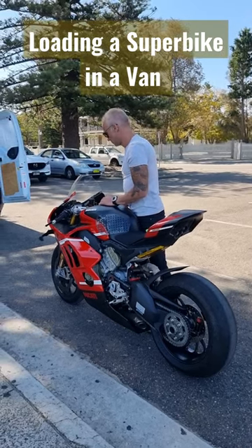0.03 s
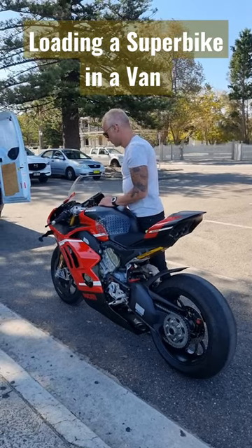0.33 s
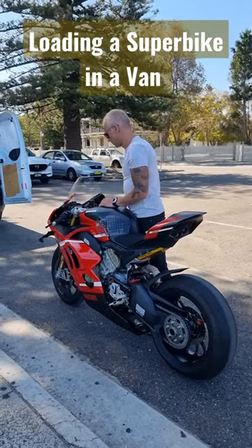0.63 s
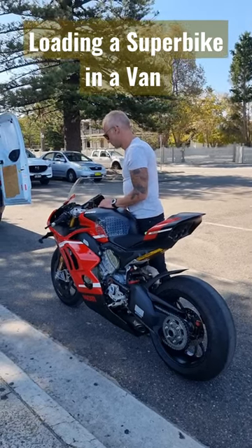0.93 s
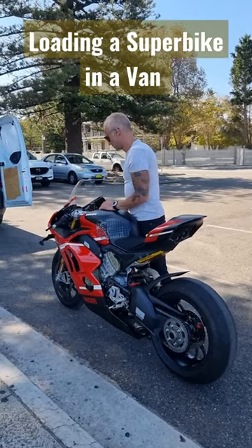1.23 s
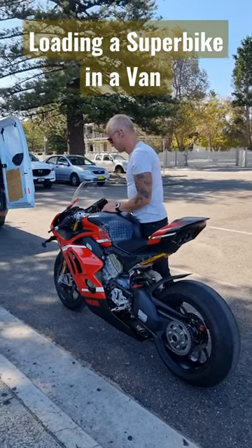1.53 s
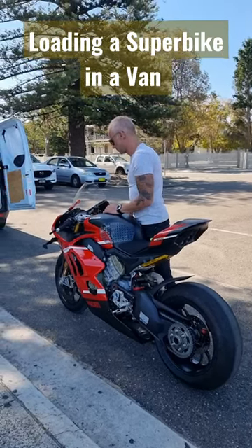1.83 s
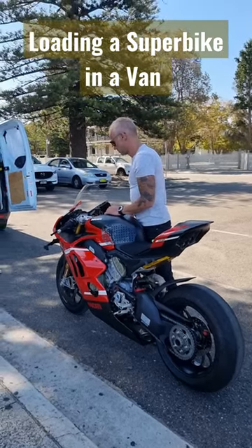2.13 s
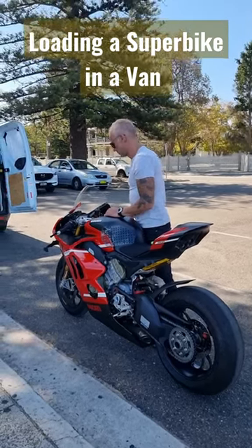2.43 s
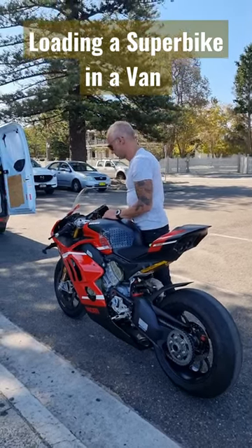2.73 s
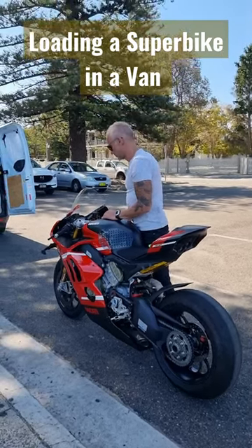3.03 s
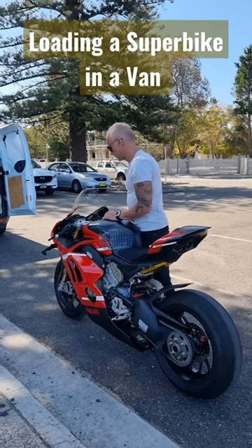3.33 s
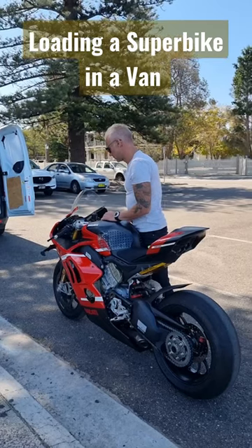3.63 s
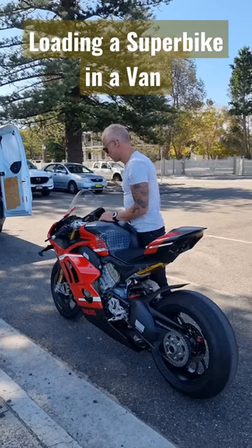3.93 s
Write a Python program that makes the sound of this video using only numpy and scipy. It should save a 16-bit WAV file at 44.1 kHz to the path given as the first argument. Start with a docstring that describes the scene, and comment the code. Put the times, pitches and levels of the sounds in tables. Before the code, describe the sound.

A motorcycle idles with a lumpy beat and is revved in five quick blips.

```python
"""A V4 motorcycle idles in an open car park and its throttle is blipped five times.
Each engine cycle gives two double exhaust beats: every slug of gas radiates a low thud that excites
the pipe's resonances, and its turbulence adds a spit of hiss. When the throttle shuts the firing dies,
the exhaust booms and the engine stumbles back to idle. The valve gear clatters throughout, the intake
and chains rasp with the revs, and the surroundings return a short, dull echo."""
import sys
import numpy as np
from scipy import signal
from scipy.fft import rfft, irfft
from scipy.io import wavfile

SR = 44100
rng = np.random.default_rng(int(sys.argv[2]) if len(sys.argv) > 2 else 0)


def wrap_up_sound(samples):
    """Save the sound to the file named by the first command line argument, as 16-bit audio."""
    columns = np.atleast_2d(samples).T
    # keep every value between -1 and 1, then stretch to whole-number steps
    tamed = np.clip(columns, -1, 1)
    steps = np.round(tamed * 32767).astype(np.int16)
    wavfile.write(sys.argv[1], SR, steps)


N = 176400
TIME = np.arange(N) / SR


def from_db(db):
    """Amplitude grows tenfold for every 20 dB."""
    return 10 ** (np.asarray(db) / 20)


def curve(rows, s):
    """Linear interpolation of a table in time."""
    return np.interp(s, *np.transpose(rows))


def at_hz(rows, hz):
    """Interpolation of a table on a log-frequency axis."""
    f, v = np.transpose(rows)
    return np.interp(np.log(hz + 1), np.log(f), v)


def cut(x, hz, kind, order=2):
    """A Butterworth filter has a maximally flat passband."""
    return signal.sosfilt(signal.butter(order, hz, kind, fs=SR, output="sos"), x + 1e-18)


def resonate(x, hz, width_hz):
    """A damped resonator passes a band around its natural frequency."""
    return signal.lfilter(*signal.iirpeak(hz, hz / width_hz, fs=SR), x + 1e-18)


def bursts(times, gains, attack_s, decay_s):
    """Envelope of exponential swells peaking at the given times; incoherent sounds add in power."""
    power = np.zeros(N)
    for s, gain in zip(times, gains):
        near = slice(*np.searchsorted(TIME, [s - 10 * attack_s, s + 10 * decay_s]))
        t = TIME[near] - s
        power[near] += (gain * np.exp(np.minimum(t / attack_s, -t / decay_s))) ** 2
    return np.sqrt(power)


# Likeness of left and right. Each row: frequency in Hz, coherence from 0 to 1.
COHERENCE = [(40, 0.46), (150, 0.9), (400, 0), (800, 0.5), (1500, 0.72), (3000, 0.2), (6000, 0), (15000, 0)]
def noise(spectrum):
    """Coloured stereo noise of unit rms; the balance of mid and side sets its coherence."""
    hz = np.fft.rfftfreq(N, 1 / SR)
    alike = np.clip(at_hz(COHERENCE, hz), 0, 1)
    mid, side = rfft(rng.standard_normal((2, N))) * from_db(at_hz(spectrum, hz))
    x = irfft(np.sqrt(1 + alike) * mid + np.sqrt(1 - alike) * side * [[1], [-1]], N)
    return x / x.std()


# Engine speed. Each row: time in seconds, four-stroke cycles per second.
CYCLE_RATE = [(0.0, 18.78), (0.174, 16.12), (0.501, 15.45), (0.873, 14.83), (1.094, 22.62), (1.221, 15.89),
              (1.32, 15.26), (1.477, 14.51), (1.695, 29.97), (1.746, 22.33), (1.998, 14.84), (2.155, 14.38),
              (2.369, 28.54), (2.588, 18.28), (2.694, 15.39), (2.884, 14.2), (3.064, 21.56), (3.205, 24.45),
              (3.286, 19.06), (3.417, 14.83), (3.663, 14.02), (3.793, 22.21), (3.892, 31.05), (4.0, 28.63)]
def revs(s):
    """Engine speed as a ratio to the idle of 15 cycles per second."""
    return curve(CYCLE_RATE, s) / 15


def crank_times(phases):
    """Phase is the integral of speed: the moments when each cycle passes the given phases."""
    cycles = np.cumsum(curve(CYCLE_RATE, TIME)) / SR - 0.1722
    marks = (np.arange(-1, cycles[-1] + 1)[:, None] + phases).ravel()
    return np.interp(marks[(marks > cycles[0]) & (marks < cycles[-1])], cycles, TIME)


def car_park(x, t60_s=0.32, first_echo_s=0.0024):
    """Scattering from a van, cars and trees gives dull echoes that decay exponentially."""
    t = TIME[:SR // 2]
    white = noise([(20, 0), (20000, 0)])[:, :len(t)]
    response = white * from_db(-60 * t / t60_s) * (t > first_echo_s)
    response = cut(response / np.sqrt(np.sum(response ** 2) / 2), 9900, "low", order=1)
    return from_db(-16) * signal.fftconvolve(x, response, axes=1)[:, :N]


# Course of the rattle. Each row: time in seconds, level in dB.
RATTLE_LEVEL = [(0, -39), (.25, -36), (.6, -40.5), (1.2, -56.5), (2.5, -43.5), (4, -71)]
# Its spectrum. Each row: frequency in Hz, density in dB.
RATTLE_SPECTRUM = [(300, -9), (750, 1), (1050, -6.5), (1300, 3.5), (1600, -5), (2000, -7), (3000, -9.5),
                   (6000, -23)]
def rattle():
    """Mid-range mechanical noise settles after the first second and swells once more midway."""
    return from_db(curve(RATTLE_LEVEL, TIME)) * noise(RATTLE_SPECTRUM)


# Intake and chain noise. Each row: frequency in Hz, density in dB.
RASP_SPECTRUM = [(300, -4), (500, -5), (800, 14), (1100, -4), (1600, -15), (2200, -4), (3000, 3), (5000, 2),
                 (7200, 5.5), (8600, -4), (15500, -5.5)]
def rasp(lag_s=0.0026):
    """The noise of rushing air and chains grows as a steep power of engine speed."""
    return from_db(-56) * revs(TIME - lag_s) ** 3.18 * noise(RASP_SPECTRUM)


# Valve gear, clutch and chains. Each row: frequency in Hz, density in dB.
GEAR_SPECTRUM = [(200, 6.5), (500, -13), (800, 5), (1050, 1), (1300, 10.5), (1600, 6), (2000, 1),
                 (2500, 2.5), (3500, -5), (4300, -3.5), (4620, -5.5), (5000, -8.5), (6500, -7.5),
                 (9000, -18), (15500, -21)]
def valve_gear(ticks_per_cycle=8, decay_s=0.00034):
    """Uneven impacts in step with the crank modulate a mechanical whirr."""
    times = crank_times(np.arange(ticks_per_cycle) / ticks_per_cycle)
    gains = from_db(-25.5 + 9.5 * rng.standard_normal(len(times)))
    ticks = bursts(times, gains, decay_s / 10, decay_s)
    return from_db(-41.5) * revs(TIME) ** 0.09 * np.hypot(1, ticks) * noise(GEAR_SPECTRUM)


# Course of the rumble. Each row: time in seconds, level in dB.
RUMBLE_ENVELOPE = [(2.45, -24.5), (2.66, -29), (2.85, -25)]
# Its spectrum. Each row: frequency in Hz, density in dB.
RUMBLE_SPECTRUM = [(35, -23), (60, -2), (80, -2.5), (120, -19), (200, -6), (350, -16), (500, -31),
                   (1000, -38), (2000, -71)]
def exhaust_rumble():
    """Low-frequency exhaust noise, steady but for one brief dip."""
    return from_db(curve(RUMBLE_ENVELOPE, TIME)) * noise(RUMBLE_SPECTRUM)


# Exhaust booms. Each row: centre and half length in seconds, peak in dB, pitch in Hz.
OVERRUN_BOOMS = [(0.134, 0.018, -11, 60.6), (1.136, 0.023, -13.5, 66), (1.251, 0.069, -22, 71),
                 (1.756, 0.065, -10.5, 75.7), (1.951, 0.086, -22, 70), (2.396, 0.028, -11, 75.6),
                 (3.268, 0.045, -13.5, 62.7), (3.984, 0.036, -9.5, 81)]
def overrun_boom(roughness=0.43, flutter_hz=30.7):
    """On a shut throttle the exhaust booms raggedly at its lowest resonance."""
    flutter = cut(rng.standard_normal(N), flutter_hz, "low")
    boom = np.zeros(N)
    for s, half_s, db, hz in OVERRUN_BOOMS:
        t = TIME - s
        boom += from_db(db) * np.exp(-np.abs(t / half_s) ** 3) * np.cos(2 * np.pi * hz * t)
    return boom * (1 + roughness * flutter / flutter.std())


# Escaping gas. Each row: frequency in Hz, density in dB.
HISS_SPECTRUM = [(300, -11), (700, 2.5), (1100, 0.5), (1600, 10.5), (2100, 1.5), (3000, 1.5), (4600, -2),
                 (5500, 3.5), (7200, 6.5), (8700, -1.5), (12500, -1), (14500, 6), (16000, 3)]
GAS_ATTACK_S = 0.0027
def turbulence():
    """Turbulent flow radiates broadband noise."""
    return noise(HISS_SPECTRUM)


# Silencer resonances. Each gives frequency and bandwidth in Hz, then level in dB.
THROAT, SHELL = (844, 260, -42), (1600, 460, -41)
def cavity(resonance, times, gains):
    """Bursts of turbulence excite one resonance of the silencer."""
    hz, width_hz, db = resonance
    band = resonate(resonate(turbulence(), hz, width_hz), hz, width_hz)
    return from_db(db) * bursts(times, gains, GAS_ATTACK_S, decay_s=0.0055) * band / band.std()


# Metallic clacks. Each row: time in seconds, extra level in dB.
SHELL_CLACKS = [(.269, 10), (.333, 10), (2.066, 7), (2.094, 5)]
def clacks():
    """Now and then the resonance of the silencer shell rings out harder."""
    times, db = np.transpose(SHELL_CLACKS)
    return cavity(SHELL, times, from_db(db))


# Modes of the outlet. Each row: frequency and bandwidth in Hz, gain in dB.
OUTLET_MODES = [(1590, 85, -10), (1786, 40, -10), (2500, 200, -6), (3300, 420, -10), (4625, 90, 1.5)]
def outlet_ring(x):
    """The modes of the metal outlet ring briefly on each spit of gas."""
    return sum(from_db(db) * resonate(x, hz, width_hz) for hz, width_hz, db in OUTLET_MODES)


# Firing order. Each row: phase in cycles, thud level in dB, its width at idle in seconds, hiss in dB.
FIRING_ORDER = [(0.0, -0.5, 0.001, 0), (0.292, -6, 0.0016, -6), (0.401, -0.5, 0.001, 1.5),
                (0.89, -2.5, 0.0015, -7.5)]
# Strength of combustion. Each row: time in seconds, level in dB.
COMBUSTION = [(0, 4), (.12, -3), (.2, 1), (.8, 1), (1.078, 1), (1.095, -7.5), (1.18, -9), (1.265, -6),
              (1.295, 0), (1.58, 0.5), (1.682, 0), (1.71, -13), (1.86, -7), (1.99, -14.5), (2.025, 0),
              (2.19, -1.5), (2.25, 1), (2.377, 0.5), (2.392, -13), (2.55, -17), (2.68, -12), (2.72, -2),
              (2.97, 0.5), (3.205, -1.5), (3.218, -16), (3.3, -8.5), (3.415, -6.5), (3.44, -0.5),
              (3.68, -0.5), (3.77, 1.5), (3.921, -1), (3.935, -13.5)]
# Beats that catch as the engine stumbles. Each row: time in seconds, extra level in dB.
CAUGHT_BEATS = [(1.205, 7.5), (1.231, 5.5), (1.821, 10), (1.931, 13.5), (1.958, 7), (2.49, 12),
                (2.588, 12.5), (2.611, 9.5)]
def firings(catch_width_s=0.0053):
    """Uneven firing intervals pair the beats. Returns one column per firing."""
    rows = []
    for phase, thud_db, width_s, hiss_db in FIRING_ORDER:
        for s in crank_times([phase]):
            caught_db = sum(db * np.exp(-((s - at) / catch_width_s) ** 4) for at, db in CAUGHT_BEATS)
            rows.append((s, curve(COMBUSTION, s) + caught_db, revs(s), thud_db, width_s, hiss_db))
    return np.transpose(rows)


# Sharper firings. Each row: time in seconds, extra dB for all gas noise, further dB for the throat.
SHARP_FIRINGS = [(.005, -0.5, 16.5), (.721, 1.5, -4), (.895, 2, 9), (.92, 2, 10), (1.206, -0.5, 0.5),
                 (1.334, 5, 3), (1.398, 2.5, 4), (1.428, 0.5, 6), (1.58, 4, 3), (2.252, 1.5, 11),
                 (2.87, 1.5, 13), (2.912, -1.5, 12), (3.072, 3.5, -5), (3.551, 5.5, 6), (3.622, 3.5, -2),
                 (3.649, 4.5, -7), (3.796, 6.5, 0)]
def gas_noise(fired):
    """Each opening exhaust valve frees turbulent gas: snap, hiss, bark and cavity tones."""
    times, load_db, speed, _, _, hiss_db = fired
    opens = times - 0.0016  # the gas noise leads the thud
    crack_db, throat_db = sum(np.outer(dbs, np.abs(times - at) < 0.006) for at, *dbs in SHARP_FIRINGS)
    scatter_db = 0.85 * rng.standard_normal(len(times))
    gains = from_db(hiss_db + crack_db + load_db + scatter_db) * speed ** 0.59
    spit = bursts(opens, gains, GAS_ATTACK_S, decay_s=0.00098)
    tail = bursts(opens, gains * from_db(-6.5), GAS_ATTACK_S, decay_s=0.011)
    late, hard = rng.standard_normal((len(times), 2)).T
    snap_gains = gains * from_db(-28.5 + 2.5 * hard)
    snap = bursts(opens + 0.00027 * late, snap_gains, attack_s=0.00029, decay_s=0.0012) * turbulence()
    snap += from_db(-2) * outlet_ring(snap)
    barks = bark(opens, gains)
    tones = cavity(THROAT, opens, gains * from_db(throat_db)) + cavity(SHELL, opens, gains)
    hiss = from_db(-31) * np.hypot(spit, tail) * turbulence()
    gas = hiss + snap + barks + tones
    return gas + outlet_ring(gas)


# Bark of a firing. Each row: frequency in Hz, density in dB.
BARK_SPECTRUM = [(40, -20), (80, -31.5), (250, 0.5), (400, -7), (540, -8.5), (680, -14.5), (900, -22.5),
                 (1500, -25.5), (3000, -33.5)]
def bark(times, gains):
    """The low band of each firing's turbulence decays exponentially."""
    return from_db(-22.5) * bursts(times, gains, GAS_ATTACK_S, decay_s=0.0065) * noise(BARK_SPECTRUM)


def deepen_suction(x, bias=0.49):
    """An even nonlinearity makes the suction of each slug of gas deeper than its push."""
    return x - bias * cut(x * np.tanh(x), 140, "high", order=1)


# Exhaust pipe resonances. Each row: frequency and bandwidth in Hz, gain in dB.
PIPE_MODES = [(215, 21, -14.5), (320, 10, -50), (351.7, 52, -5), (550, 32, -21.5)]
def thuds(fired, round_trip_s=0.01008):
    """Each slug of gas radiates a push-pull-push wave, reflects once along the pipe and rings it."""
    wave = np.zeros(N)
    for s, load_db, speed, thud_db, idle_width_s, _ in fired.T:
        width_s = idle_width_s * speed ** -0.23 * np.exp(rng.normal(0, 0.035))
        gain = from_db(thud_db + load_db + rng.normal(-4, 0.54))
        near = slice(*np.searchsorted(TIME, [s - 10 * width_s, s + 10 * width_s]))
        u = (TIME[near] - s) / width_s
        wave[near] += gain * (u * u - 1) * np.exp(-u * u / 2)
    wave = cut(wave, 52, "high", order=1)  # the outlet radiates little deep bass
    wave += from_db(-19) * np.interp(TIME - round_trip_s, TIME, wave, left=0)
    return wave + sum(from_db(db) * resonate(wave, hz, width_hz) for hz, width_hz, db in PIPE_MODES)


# Left side against right. Each row: frequency in Hz, phase lag in radians.
LEFT_PHASE_LAG = [(40, -0.6), (130, 0.29), (260, 0.34), (350, 0.8), (430, 2), (540, 2.5), (800, 2),
                  (1100, 2.5), (2000, 3), (3000, 4), (4000, 5.5), (16000, 12)]
# Shading of the left side. Each row: frequency in Hz, level against the right in dB.
LEFT_SHADING = [(80, 2), (160, -1.5), (270, -2), (390, -7), (530, -6.5), (750, 1.5), (1280, -4),
                (1530, -8.5), (1820, -6.5), (2200, -0.5), (4100, -5.5), (7300, -2.5), (8400, -6),
                (15000, -4.5)]
def place_right(x, drift_db_per_s=0.2):
    """Phase and level differences place the engine a little to the right, slowly more so."""
    size = N + SR // 10
    hz = np.fft.rfftfreq(size, 1 / SR)
    sides = np.array([[.5], [-.5]])
    shading = from_db(sides * at_hz(LEFT_SHADING, hz))
    lag = np.exp(-1j * at_hz(LEFT_PHASE_LAG, hz) * [[1], [0]])
    heard = irfft(rfft(x, size) * shading * lag, size)[:, :N]
    return heard * from_db(-sides * drift_db_per_s * (TIME - 2))


def scene():
    """Exhaust, machinery and their echoes add by superposition."""
    fired = firings()
    bike = deepen_suction(thuds(fired)) + rattle() + clacks() + gas_noise(fired)
    bike += overrun_boom() + exhaust_rumble() + valve_gear() + rasp()
    return place_right(bike + car_park(bike))


def record(dry, cutoff_hz=15750):
    """Soft saturation rounds the highest peaks and a steep low-pass cuts the top."""
    rounded = dry / (1 + dry ** 8) ** (1 / 8)
    return signal.sosfilt(signal.ellip(10, .1, 80, cutoff_hz, fs=SR, output="sos"), rounded)


dry = scene()
out = record(dry)
wrap_up_sound(out)
```